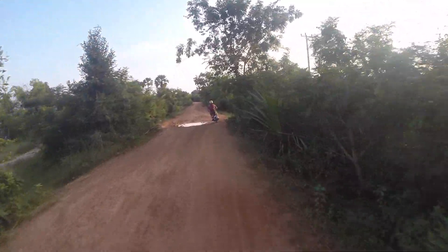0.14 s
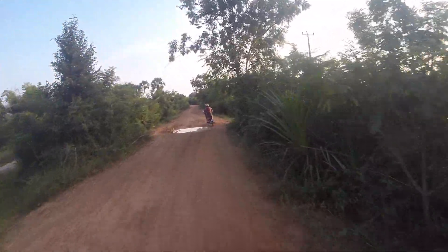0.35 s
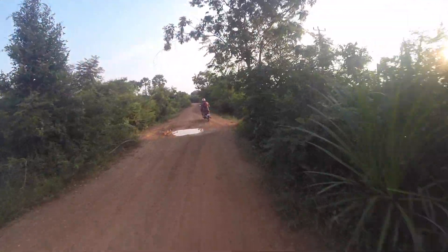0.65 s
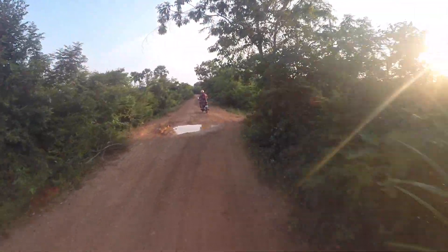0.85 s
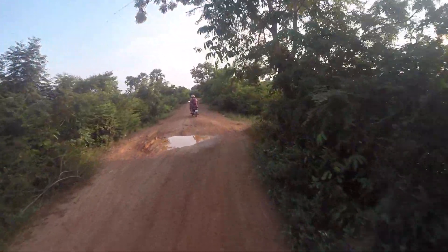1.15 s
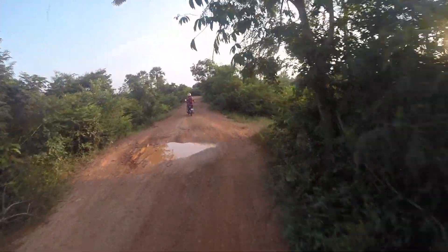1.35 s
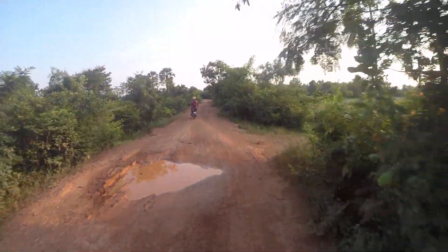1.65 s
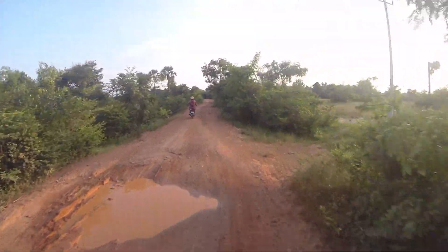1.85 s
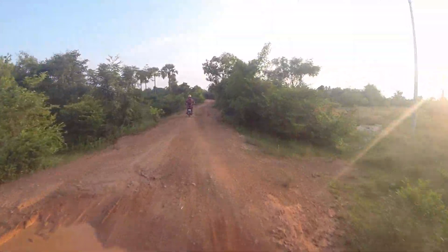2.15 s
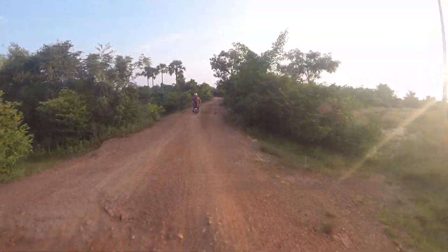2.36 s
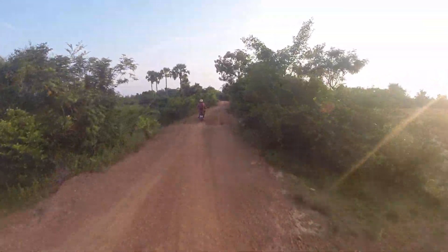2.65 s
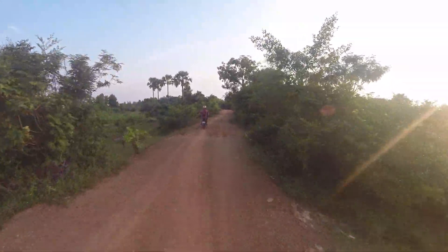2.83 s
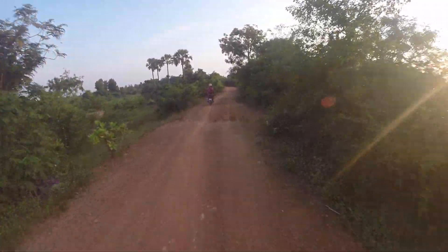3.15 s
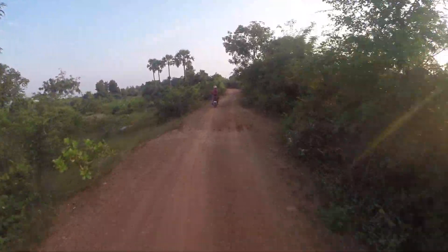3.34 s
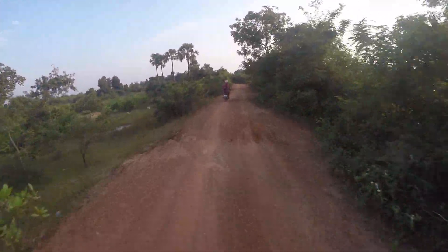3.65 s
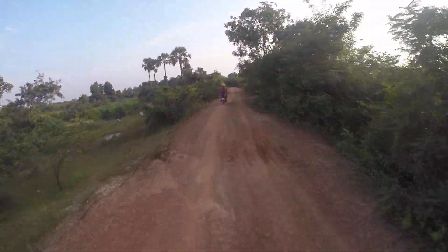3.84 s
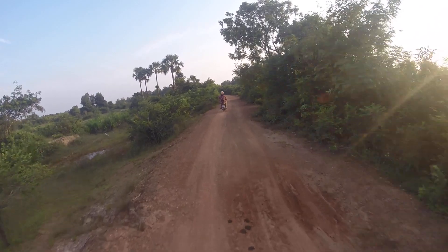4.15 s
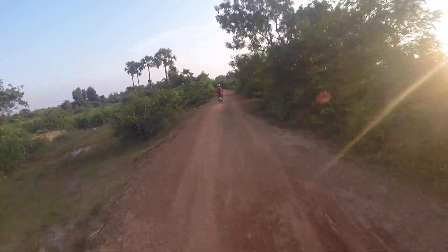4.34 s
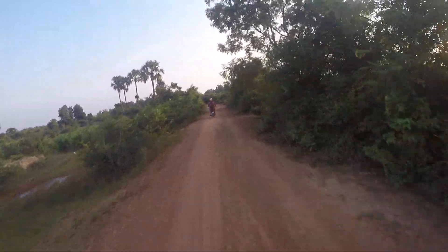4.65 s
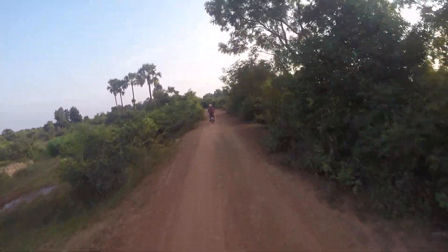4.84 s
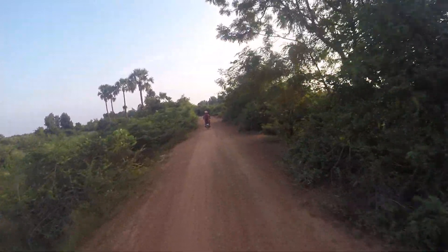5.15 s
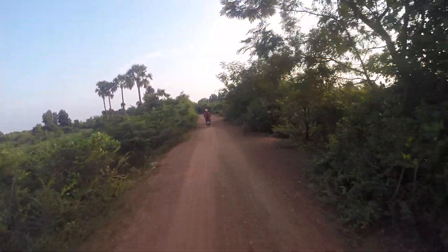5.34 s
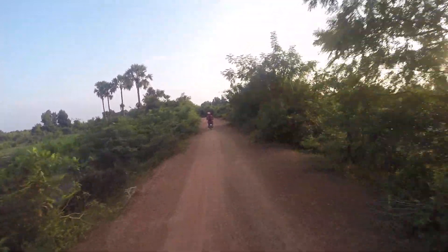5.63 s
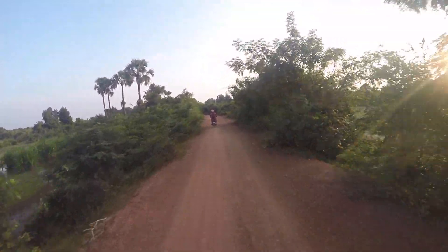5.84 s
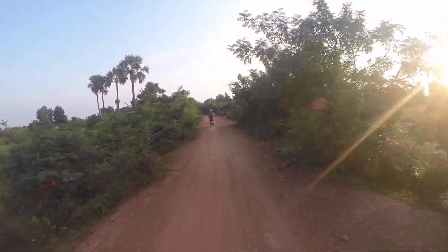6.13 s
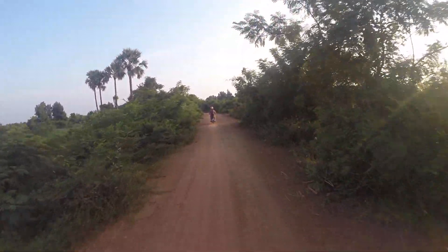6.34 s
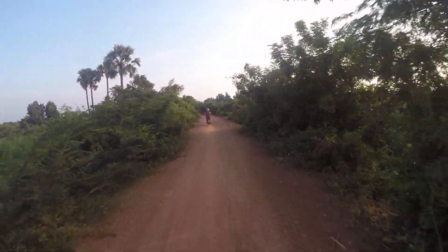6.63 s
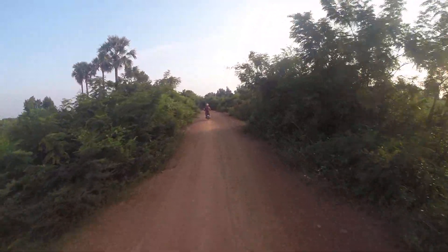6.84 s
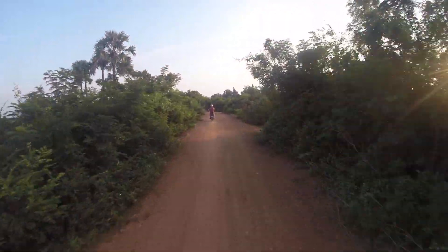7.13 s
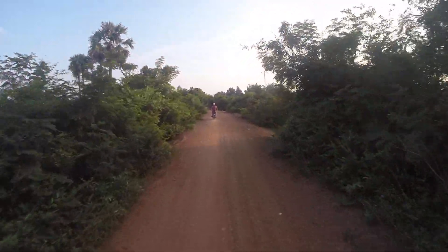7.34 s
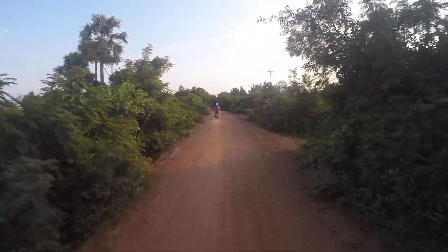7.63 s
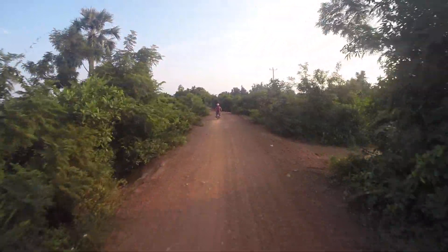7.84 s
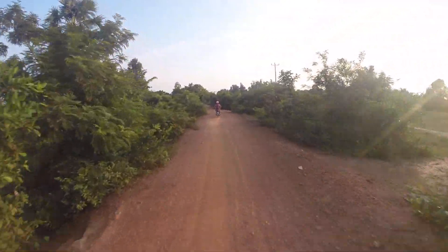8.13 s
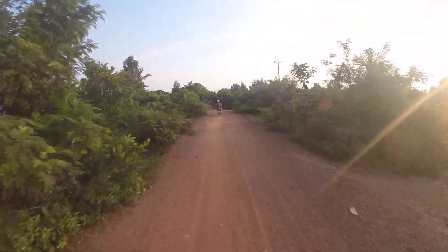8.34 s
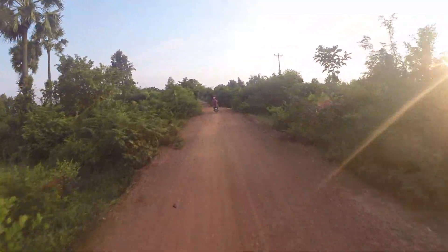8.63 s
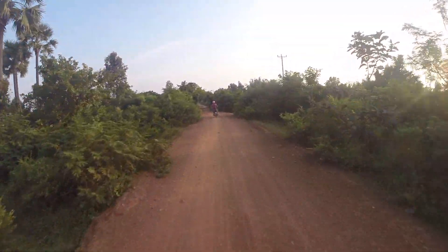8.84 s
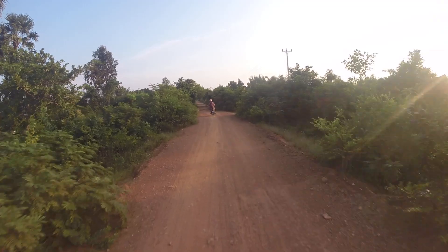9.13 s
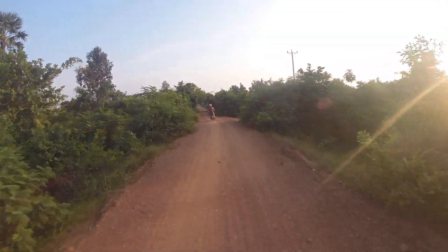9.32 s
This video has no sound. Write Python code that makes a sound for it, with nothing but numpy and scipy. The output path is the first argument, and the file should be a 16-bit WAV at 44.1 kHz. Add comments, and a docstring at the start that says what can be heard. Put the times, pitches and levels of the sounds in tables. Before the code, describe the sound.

A small moped drones along a gritty dirt track in rising wind, jolting through one hard pothole crack before picking up speed.

```python
"""On a dirt track, a moped gathers speed, heard from a cased camera on the ride.
The single cylinder drones as a stack of harmonics under filtered-noise wind buffeting and gust hiss.
Tyre crunch, stone rasp and gravel spray are random grains; bumps, knocks and a pothole crack ring modes.
Wind, hiss and case chatter grow with speed, ruts shake the mount, and insects flit by as pulsed noise."""
import sys
import numpy as np
from scipy import signal
from scipy.io import wavfile

SR = 44100
rng = np.random.default_rng(int(sys.argv[2]) if len(sys.argv) > 2 else 0)


def transcribe(u):
    """Save the signal u as a 16-bit wav file named by the first command-line argument.

    u: samples, shape (n,) or (channels, n), limited to [-1, 1]; the rate is SR.
    q: integer samples, one column per channel.
    """
    v = np.clip(np.atleast_2d(u).T, -1, 1)
    q = np.round(v * 32767).astype(np.int16)
    wavfile.write(sys.argv[1], SR, q)


N = 418068
TIME = np.arange(N) / SR
BINS_HZ = abs(np.fft.fftfreq(8192, 1 / SR))
EDGE_HZ = 15200  # upper edge of the camera's band
CRUISE_RATE = 24  # firings a second at which the with_speed levels hold
POTHOLE_S = 4.4357

# engine speed: [t/s, firing rate/Hz]
FIRING = [(0, 19.3), (.5, 19.7), (1, 21), (2.05, 22.1), (2.7, 22), (3.5, 21), (4.1, 21.4), (5.05, 22.4),
          (5.35, 23.4), (6, 24.25), (6.8, 25.3), (7.25, 25.8), (8.15, 27.7), (9.1, 29.6), (9.48, 30)]
# engine load, as exhaust level: [t/s, level/dB]
LOAD = [(0, -50), (.9, -49.5), (1.25, -45), (2, -45.5), (2.6, -48.5), (4.3, -48.5), (5.3, -45.5),
        (7.4, -46), (8.2, -41), (9.48, -39)]
# exhaust note with the pipe's resonances, before levelling: [f/Hz, level/dB]
EXHAUST = [(15, -35), (42, -17), (63, 1.5), (86, -12), (108, -4.5), (130, -18), (165, -5.5), (220, -16.5),
           (262, -9.5), (295, -12.5), (330, -13.5), (400, -23.5), (580, -19.5), (900, -48)]
# tone of the trembling mount, before levelling: [f/Hz, level/dB per Hz]
SHAKE_TONE = [(5, -34.5), (12, 4), (22, -1), (30, -6), (39, 3), (48, -11), (70, -12.5), (150, -36.5),
              (400, -85)]
# tone of the wind buffeting, before case and levelling: [f/Hz, level/dB per Hz]
BUFFET_TONE = [(25, -17.5), (60, -4), (90, -3), (125, 2), (180, -7.5), (250, -13), (400, -19), (750, -22.5),
               (1200, -19.5), (3000, -41), (8000, -82)]
# tone of the crushed grit, before case and levelling: [f/Hz, level/dB per Hz]
CRUNCH_TONE = [(150, -24), (450, 1.5), (800, -5), (1150, -1), (1750, -4.5), (2100, -0.5), (2600, 0),
               (3200, -7.5), (4600, -14.5), (7000, -24.5), (10000, -34.5), (15000, -50)]
# tone of the gust hiss, before case and levelling: [f/Hz, level/dB per Hz]
GUST_TONE = [(800, -48.5), (1700, -8.5), (2400, -1), (3050, 3.5), (3600, 0), (4300, -40.5), (5600, -9.5),
             (6600, -23), (8200, -44), (12000, -65), (15000, -44)]
# tone of the finer air hiss, before case and levelling: [f/Hz, level/dB per Hz]
AIR_TONE = [(1500, -61), (3500, 15.5), (5200, 4.5), (6300, 5), (7500, 6), (8700, -6), (10000, -12),
            (11500, -20.5), (12600, -12), (13500, -35), (15000, -37)]
# resonances and notches of the camera case: [f/Hz, width at half the dB/Hz, level/dB]
CASE = [(323.8, 48, 7), (564.5, 21, 4.5), (864, 180, 0.5), (1297.5, 149, 8.5), (1563, 255, 5),
        (2060, 330, 5), (2455, 144, 6.5), (2818, 69, -12.5), (2870, 110, 3), (3192, 220, 5),
        (3520, 170, -5), (4020, 650, -5), (5570, 800, 7), (6200, 230, -4), (6900, 800, 4), (9860, 1150, 6),
        (11750, 1370, 8)]
# grip of the tyres on the grit, before the crunch gain: [t/s, level/dB]
GRIT = [(0, -52.5), (.88, -57), (1.35, -49.5), (2.45, -48), (3.7, -51), (4.8, -47), (5.2, -51),
        (5.45, -46.5), (6.1, -49), (7.3, -46.5), (9.48, -42.5)]
# gusts across the case, before the gust gains: [start t/s, end t/s, level/dB]
GUSTS = [(.15, .36, -59), (1.18, 2.104, -60), (2.122, 2.92, -53), (3.03, 3.3, -52), (3.25, 4.198, -55),
         (4.117, 4.326, -46), (4.54, 4.96, -55.5), (4.92, 5.114, -44.5), (5.317, 5.642, -44),
         (5.766, 5.975, -48.5), (6.296, 6.686, -48.5), (6.727, 7.052, -44), (7.12, 7.4, -48.5),
         (7.52, 8.297, -41.5), (8.212, 8.82, -40), (8.726, 9.498, -36)]
# rutted stretches, before each layer's rut gain: [start t/s, end t/s, level/dB]
RUTS = [(.45, .95, -45), (1.123, 1.495, -42), (2.168, 2.71, -37), (2.836, 3.367, -35.5),
        (4.342, 4.88, -38.5), (5.2, 5.797, -38), (6.29, 6.587, -38)]
# insects passed at the roadside: [start t/s, end t/s, f/Hz, width/Hz, pulse rate/Hz, level/dB]
INSECTS = [(0.146, 1.25, 5300, 1010, 25, -60), (.5, 1.1, 7670, 450, 25, -71.5),
           (2.197, 2.95, 9800, 700, 22, -73), (5.15, 5.55, 9700, 600, 22, -72)]
# loose parts and stones striking: [t/s, peak level/dB, f/Hz, t60/s]
CLACKS = [(1.533, -36, 1303, 0.075), (3.5205, -27.5, 1280, 0.016), (4.4425, -25, 2210, .012),
          (4.4524, -30, 5700, 0.0017), (4.453, -23.5, 496, 0.013), (4.5127, -24.5, 2060, 0.015),
          (4.558, -31, 2100, 0.014), (4.562, -33, 1290, 0.066), (5.548, -33, 2100, .012),
          (5.609, -32, 1260, 0.048), (5.647, -28, 2050, 0.011), (6.412, -31.5, 1284, 0.058)]
# coarse patches of track: [start t/s, end t/s, level/dB]
PATCHES = [(1.573, 2.037, -44), (2.493, 2.583, -39.5), (2.567, 2.933, -43.5), (4.512, 4.598, -44),
           (4.73, 4.825, -49), (4.92, 5.04, -44.5), (5.297, 5.692, -43)]
# modes of the camera mount, relative to one another: [f/Hz, level/dB, t60/s]
MOUNT = [(24.2, -11, 0.28), (37.8, 2.5, 0.29), (63.4, -9, 0.2), (123, 2.5, 0.082), (191, -8.5, 0.12)]
# bumps in the track: [t/s, peak level/dB, contact time/s]
BUMPS = [(2.459, -22.5, 0.019), (3.03, -29, 0.0037), (3.99, -30, 0.013), (4.425, -16, 0.0025),
         (4.4394, -11, 0.0031), (4.453, -8.5, 0.0099), (4.486, -14, 0.0048), (4.521, -13.5, 0.0036),
         (4.531, -5.5, 0.0089), (4.604, -23, 0.0048), (4.732, -19, 0.0047), (4.762, -17.5, 0.029),
         (4.804, -16.5, 0.023), (4.847, -25, 0.028), (5.587, -19, 0.011), (5.608, -20.5, 0.014),
         (6.436, -28, 0.016)]
# gravel sprayed as the tyres enter and leave the pothole: [start t/s, end t/s, level/dB]
SPRAYS = [(4.407, 4.442, -41), (4.538, 4.588, -38)]
# tone of the sprayed gravel, before levelling: [f/Hz, level/dB per Hz]
GRAVEL_TONE = [(150, -20), (350, 7), (700, 0.5), (1500, 1), (3500, -17), (5200, -9), (8000, -29),
               (15000, -40)]
# modes as the ride bottoms out in the pothole, before filtering: [f/Hz, level/dB, t60/s]
CRACK = [(800, -11, .006), (1280, -22, .012), (1510, -8, 0.054), (1870, 10, 0.0054), (2320, -16, 0.007)]
# faint electronic whine: [f/Hz, rms level/dB]
WHINE = [(10645, -81), (10693, -89), (13187, -92.5)]


def amp(db):
    """Decibels to gain."""
    return np.exp(np.asarray(db) * np.log(10) / 20)


def evened(x):
    """Scales to rms 1."""
    return x / np.sqrt(np.mean(x ** 2) + 1e-20)


def curves(rows):
    """Each column of a table, joined by straight lines in time."""
    s, *columns = np.transpose(rows)
    return [np.interp(TIME, s, column) for column in columns]


def add(mix, s, sound):
    """Mixes a sound in at time s."""
    part = mix[round(s * SR):][:len(sound)]
    part += sound[:len(part)]


def filtered(x, db):
    """A causal filter with the given dB at BINS_HZ: it rings only after a push."""
    # minimum phase, derived from the log magnitude
    response = np.exp(np.conj(signal.hilbert(np.log(amp(db)))))
    ring = np.fft.ifft(response).real
    return signal.oaconvolve(x, ring[:len(ring) // 2])[:len(x)]


def shaped(x, spectrum):
    """Colours x by a (Hz, dB) spectrum, joined along log frequency."""
    hz, db = np.transpose(spectrum)
    return filtered(x, np.interp(np.log(BINS_HZ + 1), np.log(hz + 1), db))


def band(x, hz, width):
    """A resonant band of x, at rms 1."""
    edges = [hz - width / 2, hz + width / 2]
    return evened(signal.sosfilt(signal.butter(2, edges, "band", fs=SR, output="sos"), x))


def through_case(x):
    """The case rings after everything that reaches the microphone through it."""
    case_db = sum(db * .5 ** ((2 * (BINS_HZ - hz) / width) ** 2) for hz, width, db in CASE)
    return filtered(x, case_db)


def mode(hz, t60):
    """A struck mode dying away."""
    t = np.arange(SR // 2) / SR
    return np.sin(2 * np.pi * hz * t) * amp(np.maximum(-60 * t / t60, -200))


def wander(rate):
    """Random drift of rms 1, gliding straight between rate new values a second."""
    knots = np.arange(0, TIME[-1] + 1, 1 / rate)
    values = rng.standard_normal(8192)
    return evened(np.interp(TIME, knots, values[:len(knots)]))


def grains(per_s, spread_db):
    """Randomly timed clicks of either sign, many small and a few large, at rms 1."""
    size = amp(abs(spread_db) * np.minimum(rng.exponential(1, N), 4))
    struck = rng.random(N) < per_s / SR
    return evened(size * rng.choice([-1, 1], N) * struck)


def swell(start, end):
    """Rises and falls smoothly between two times."""
    return np.sin(np.pi * np.clip((TIME - start) / (end - start), 0, 1))


def with_speed(cruise_db, db_per_doubling):
    """A gain that grows with road speed, which follows the engine in one gear."""
    return amp(cruise_db + db_per_doubling * np.log2(curves(FIRING)[0] / CRUISE_RATE))


def gusting(attack_s=0.055, release_s=0.089):
    """Strength of the gusts: each rises, holds and drops away."""
    strength = 0
    for start, end, db in GUSTS:
        ramp = np.minimum((TIME - start) / attack_s, (end - TIME) / release_s)
        strength = strength + amp(db) * np.clip(ramp, 0, 1)
    return strength


def jolting():
    """Strength of the shaking as the wheels run through ruts."""
    return sum(amp(db) * swell(start, end) for start, end, db in RUTS)


def engine(unevenness=0.04, speed_jitter=0.0016, crank_db=-6, crank_rise_db=9, crank_waver_db=1.8,
           count=22):
    """The exhaust sounds harmonics of the firing rate; the crank hums at twice that rate, more so at speed."""
    rate, load_db = curves(FIRING)[0], curves(LOAD)[0]
    cycles = np.cumsum(rate * (1 + speed_jitter * wander(15))) / SR
    pipe_hz, pipe_db = np.transpose(EXHAUST)
    lags = rng.random(count)  # the muffler smears each firing over the whole cycle
    exhaust = np.zeros(N)
    for k, lag in enumerate(lags, 1):
        pipe_gain = np.interp(k * rate, pipe_hz, amp(pipe_db))
        exhaust += pipe_gain * np.cos(2 * np.pi * (k * cycles + lag))
    crank_tone = np.cos(2 * np.pi * (2 * cycles + lags[1]))
    crank = evened(crank_tone * amp(crank_waver_db * wander(10)))
    drone = evened(exhaust) + with_speed(crank_db, crank_rise_db) * crank
    return amp(load_db) * drone * (1 + unevenness * wander(25))


def wind_and_shake(shake_db=-41.5, shake_rise_db=1, sway_db=2.0, rut_shake_db=4.5,
                   buffet_db=-40.5, buffet_rise_db=13, rut_buffet_db=-4, lumps_db=1.2):
    """The track keeps the mount trembling while eddies beat on the microphone; both grow with speed and ruts."""
    shake = evened(shaped(rng.standard_normal(N), SHAKE_TONE) * amp(sway_db * wander(5)))
    lumpy = rng.standard_normal(N) * amp(lumps_db * wander(25))
    eddies = evened(through_case(shaped(lumpy, BUFFET_TONE)))
    ruts = jolting()
    shake_level = np.hypot(with_speed(shake_db, shake_rise_db), amp(rut_shake_db) * ruts)
    buffet_level = np.hypot(with_speed(buffet_db, buffet_rise_db), amp(rut_buffet_db) * ruts)
    return shake_level * shake + buffet_level * eddies


def tyres(crunch_db=5.0, rut_db=-14, grit_per_s=2500, spread_db=1.5, flutter_db=1.1, patchy_db=0.55):
    """Grit is crushed under the tyres in dense, clumped grains over noise, harder in ruts."""
    level = np.hypot(amp(curves(GRIT)[0] + crunch_db), amp(rut_db) * jolting())
    grit = grains(grit_per_s, spread_db) + 0.92 * rng.standard_normal(N)
    clumped = grit * amp(flutter_db * wander(60) + patchy_db * wander(12))
    return level * evened(through_case(shaped(clumped, CRUNCH_TONE)))


def airstream(gust_db=1.14, breeze_db=-60, breeze_rise_db=14, gust_flutter_db=1.63,
              least_air_db=-62, air_db=-61.0, air_rise_db=38, air_gust_db=-19, air_flutter_db=1.5):
    """Gusts hiss across the edges of the case, over a finer hiss that grows steeply with speed."""
    gusts = gusting()
    gust_level = np.hypot(with_speed(breeze_db, breeze_rise_db), amp(gust_db) * gusts)
    steady_air = np.hypot(amp(least_air_db), with_speed(air_db, air_rise_db))
    air_level = np.hypot(steady_air, amp(air_gust_db) * gusts)
    gust = shaped(rng.standard_normal(N), GUST_TONE) * amp(gust_flutter_db * wander(55))
    air = shaped(rng.standard_normal(N), AIR_TONE) * amp(air_flutter_db * wander(90))
    return gust_level * evened(through_case(gust)) + air_level * evened(through_case(air))


def chatter(chatter_db=-49, rise_db=40, loudest_db=-45, rut_db=-14,
            taps_per_s=300, spread_db=1.5, ring_hz=1280, t60=0.014, jiggle_db=1.6):
    """The case taps one mode in its holder, harder with speed and ruts until its play is used up."""
    level = np.hypot(with_speed(chatter_db, rise_db), amp(rut_db) * jolting())
    level = np.minimum(level, amp(loudest_db))
    flurries = grains(taps_per_s, spread_db) * amp(jiggle_db * wander(17))
    taps = signal.oaconvolve(flurries, mode(ring_hz, t60))[:N]
    return level * evened(through_case(taps))


def insects(pulse_share=0.39, timing_jitter=.12, uneven_db=1.0):
    """Each insect rasps in quick, uneven pulses of noise that swell and fade as it is passed."""
    out = np.zeros(N)
    drift = timing_jitter * wander(22)  # in pulse periods
    force = amp(uneven_db * wander(25))
    for start, end, hz, width, rate, db in INSECTS:
        pulses = np.exp(-((TIME * rate + drift) % 1) / pulse_share)
        strokes = force * pulses * rng.standard_normal(N)
        out += amp(db) * swell(start, end) * band(strokes, hz, width)
    return out


def clacks(reach=1.67):
    """Short knocks, coloured by the case; the blunt contact leaves little far above their pitch."""
    out = np.zeros(N)
    for s, db, hz, t60 in CLACKS:
        blunt = signal.butter(4, min(reach * hz, EDGE_HZ), fs=SR, output="sos")
        knock = through_case(signal.sosfilt(blunt, mode(hz, t60)))
        add(out, s, amp(db) * knock / abs(knock).max())
    return out


def rasp(rasp_hz=2200, width_hz=750, stones_per_s=1100, spread_db=-0.2):
    """Coarser stones rasp in one band where the tyres cross a rough patch."""
    stones = evened(through_case(band(grains(stones_per_s, spread_db), rasp_hz, width_hz)))
    return stones * sum(amp(db) * swell(start, end) for start, end, db in PATCHES)


def bumps(lowest_hz=9):
    """Each bump pushes the mount; a short contact wakes its higher modes too."""
    out = np.zeros(N)
    ring = sum(amp(db) * mode(hz, t60) for hz, db, t60 in MOUNT)
    ring = signal.sosfilt(signal.butter(1, lowest_hz, "high", fs=SR, output="sos"), ring)
    t = np.arange(SR // 20) / SR
    for s, db, contact in BUMPS:
        push = np.sin(np.pi * np.minimum(t / contact, 1)) ** 2
        thump = signal.fftconvolve(ring, push)
        add(out, s, amp(db) * thump / abs(thump).max())
    return out


def spray(stones_per_s=1500, spread_db=3.5):
    """Small stones are thrown against the frame as a burst of uneven grains."""
    stones = evened(shaped(grains(stones_per_s, spread_db), GRAVEL_TONE))
    return stones * sum(amp(db) * swell(start, end) for start, end, db in SPRAYS)


def crack(peak_db=-9.5, blunt_hz=2700, lowest_hz=600, rebound_s=0.00186, rebound_db=-12):
    """A blunt, hard stop at the bottom of the pothole rings short modes, with one quick rebound."""
    ring = sum(amp(db) * mode(hz, t60) for hz, db, t60 in CRACK)
    ring = signal.sosfilt(signal.butter(2, lowest_hz, "high", fs=SR, output="sos"), ring)
    ring = signal.sosfilt(signal.cheby1(6, 1, blunt_hz, fs=SR, output="sos"), ring)
    knock = amp(peak_db) * ring / abs(ring).max()
    out = np.zeros(N)
    add(out, POTHOLE_S, knock)
    add(out, POTHOLE_S + rebound_s, amp(rebound_db) * knock)
    return out


def scene():
    """Everything that reaches the one microphone."""
    ride = engine() + wind_and_shake() + airstream() + chatter()
    track = tyres() + clacks() + rasp() + bumps() + spray() + crack()
    return (ride + track + insects())[None]


def record(dry, self_noise_db=-75):
    """The camera adds its thin whine and a faint hiss, and limits the band."""
    # root 2 turns an rms level into a sine's peak
    whine = sum(np.sqrt(2) * amp(db) * np.sin(2 * np.pi * hz * TIME) for hz, db in WHINE)
    hiss = amp(self_noise_db) * rng.standard_normal(N)
    low_pass = signal.firwin(511, EDGE_HZ, window=("kaiser", 9), fs=SR)
    return signal.oaconvolve(dry + whine + hiss, low_pass[None], "same")


dry = scene()
out = record(dry)
transcribe(out)
```